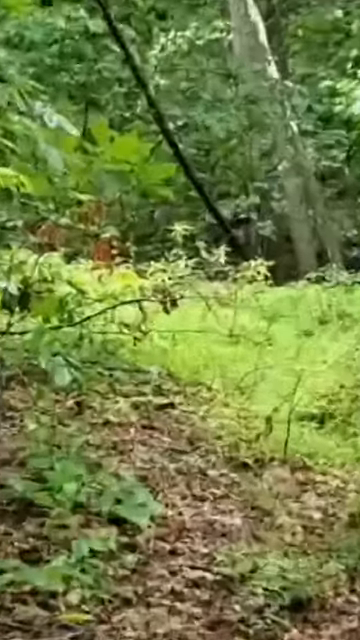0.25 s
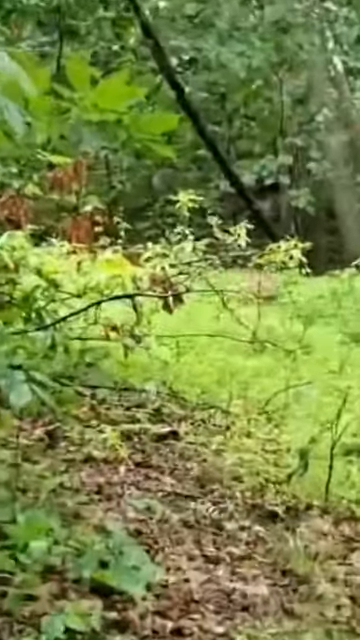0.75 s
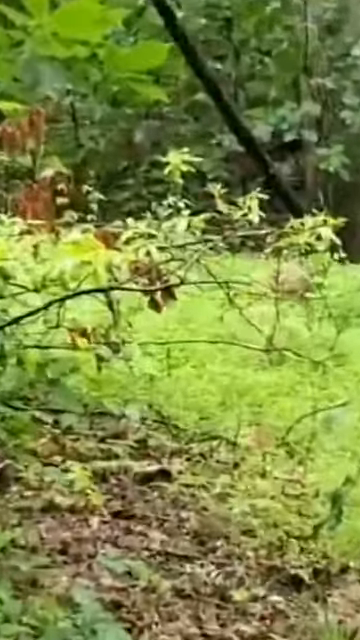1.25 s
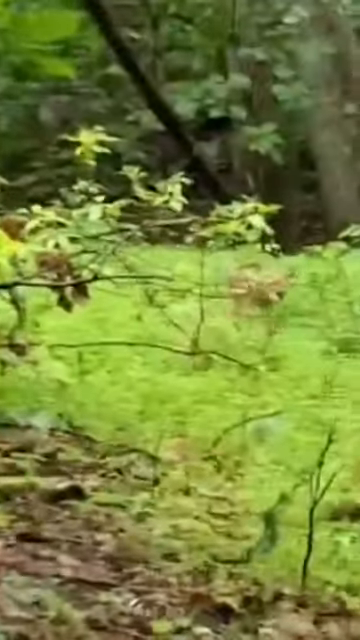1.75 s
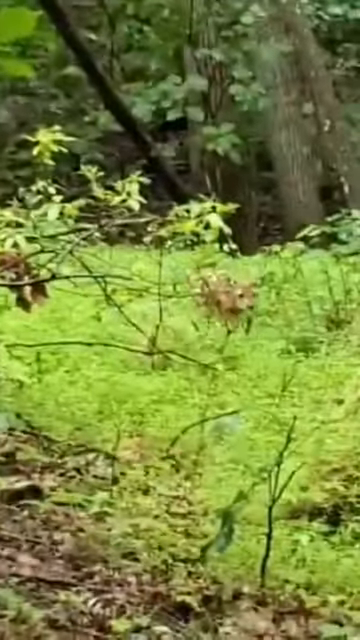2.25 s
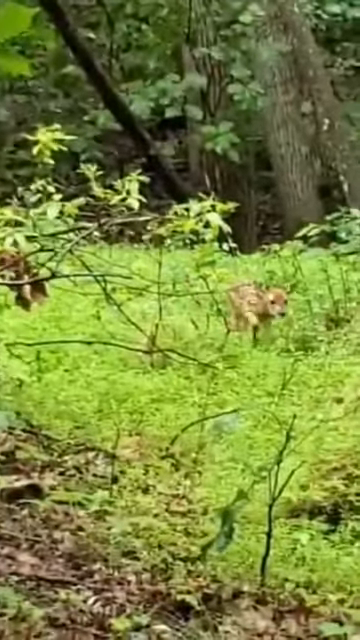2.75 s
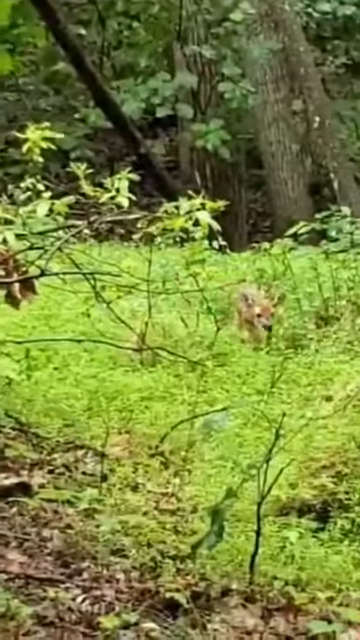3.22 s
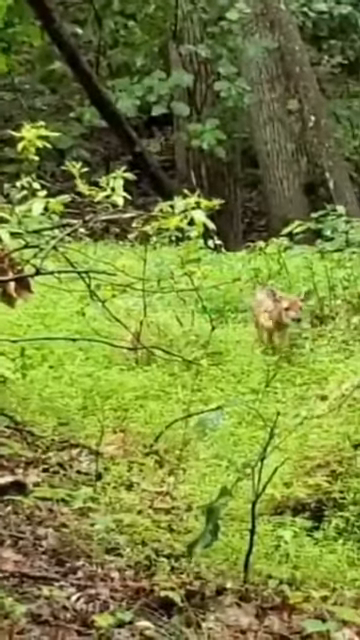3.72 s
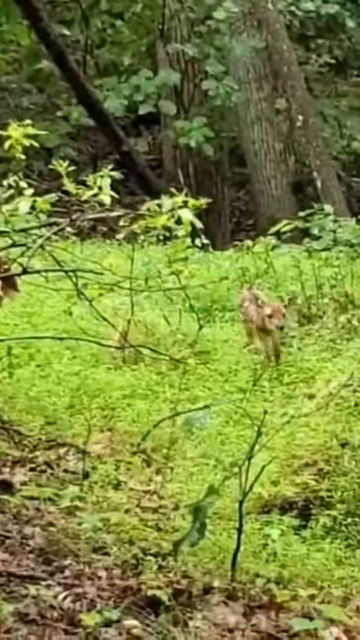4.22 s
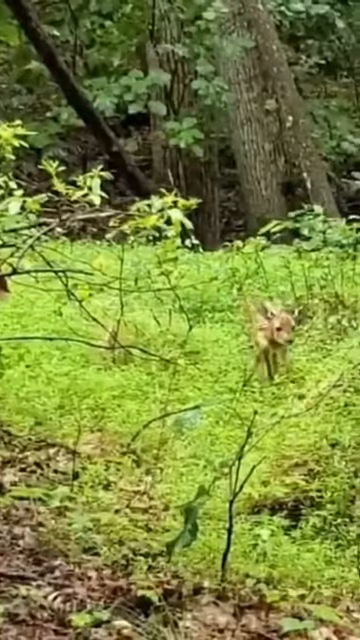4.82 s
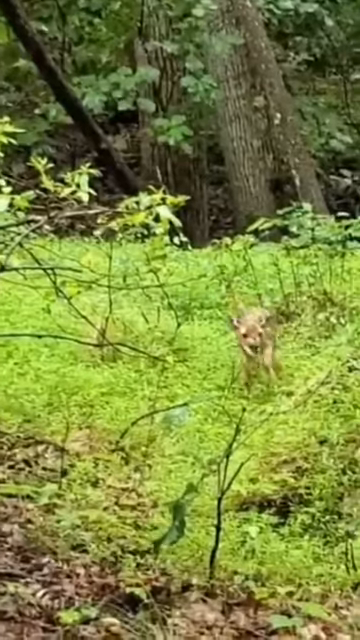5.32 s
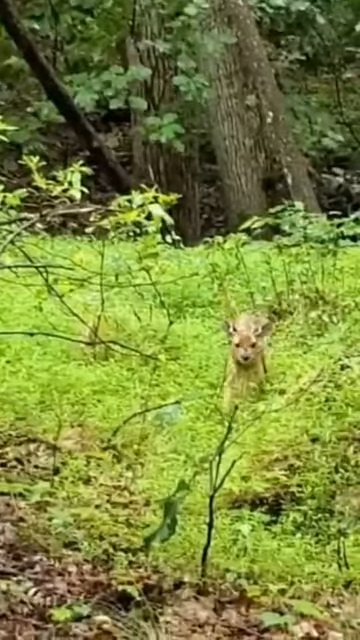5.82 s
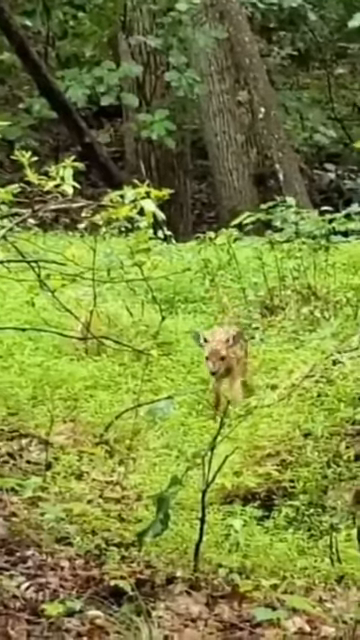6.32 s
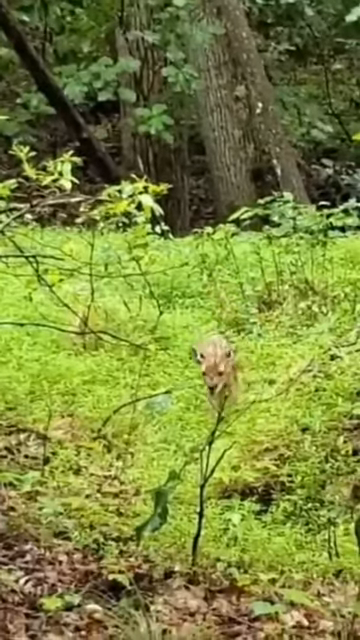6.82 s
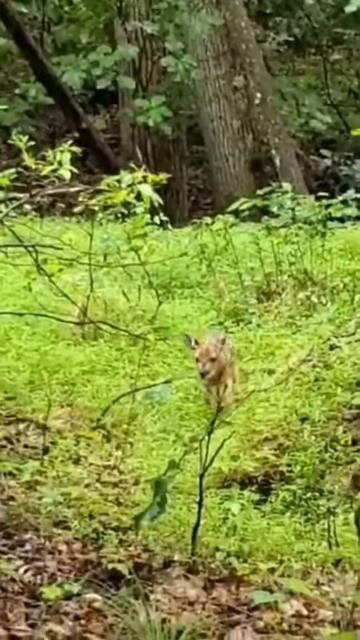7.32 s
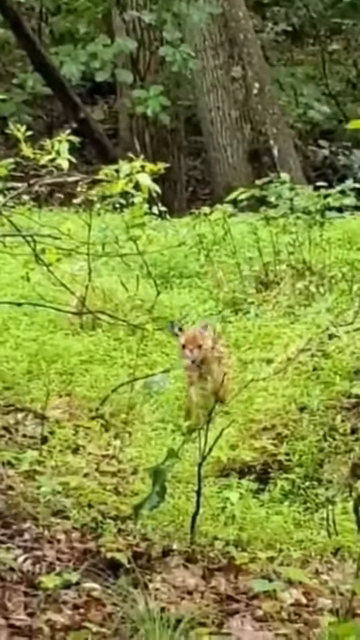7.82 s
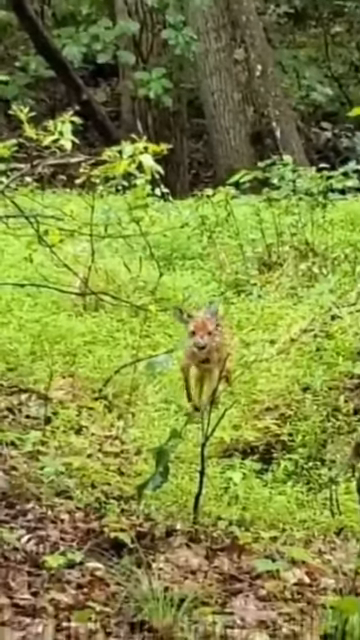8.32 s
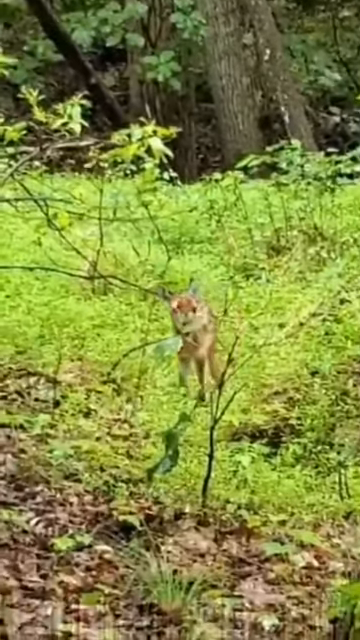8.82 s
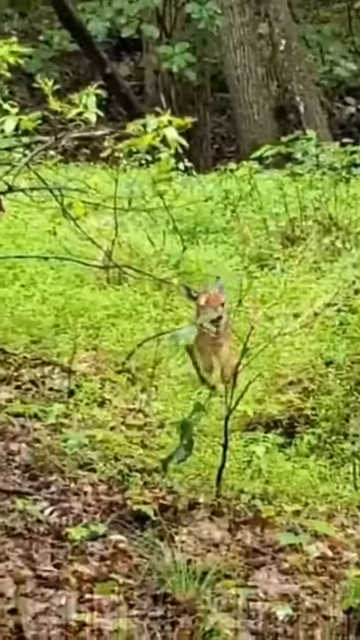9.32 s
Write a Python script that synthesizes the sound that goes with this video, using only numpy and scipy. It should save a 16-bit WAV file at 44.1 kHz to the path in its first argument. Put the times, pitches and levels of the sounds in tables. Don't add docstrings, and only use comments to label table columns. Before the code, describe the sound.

Outdoors among trees, a young deer calls repeatedly: short, whining, buzzy bleats that catch quickly, hold, then sag downward, the final two longer and stronger. Short woodland echoes follow each one. Between calls there is a faint steady leaf hiss, scattered dry twig snaps close by, dull wind thumps on the microphone's two sides, and a brief distant bird whistle late on.

```python
import sys
import numpy as np
from scipy import signal
from scipy.fft import rfft, irfft, next_fast_len
from scipy.io import wavfile
from scipy.ndimage import uniform_filter1d

SR = 44100
rng = np.random.default_rng(int(sys.argv[2]) if len(sys.argv) > 2 else 0)


def ratio(d):
    e = np.asarray(d, float) / 20
    return 10 ** e


def transcribe(u):
    v = np.clip(np.atleast_2d(u).T, -1, 1)
    q = np.round(v * 32767).astype(np.int16)
    wavfile.write(sys.argv[1], SR, q)


N = 421596

# time the folds catch in seconds, time until they have sagged in seconds,
# effort in dB, top pitch in Hz.
BLEATS = [
    (1.499, .415, -22, 574),
    (3.253, 0.44, -22, 567.1),
    (5.012, .39, -22.5, 567.2),
    (6.803, .505, -21, 561),
    (9.226, 0.53, -20, 571.2),
]
# creak before they catch in seconds, tensing time in seconds,
# suddenness of the sag (a power), end of the call as a share of the sag time.
FOLDS = [
    (.035, .025, 4.05, 1.02),
    (.035, .035, 5.18, 1.08),
    (.03, .027, 3.9, 1.3),
    (.042, .025, 3.29, 1.07),
    (.025, 0.04, 3.8, 1.05),
]
# low partials in dB, main resonance in dB,
# partials above it in dB, top partials in dB, left minus right in dB.
FACING = [
    (-0.9, 0, -2.5, -5, -1.5),
    (0.7, 2, -1.4, -2, -.5),
    (1, 2.1, -1.1, -1, 0),
    (-2.5, 1, -3, -3.5, 0),
    (0.5, 0.5, -2.5, -0.5, -0.5),
]
FACING_HZ = [1500, 2400, 3400, 5000, 7000, 12000]
# frequency in Hz, level in dB.
THROAT = [(560, -42.5), (950, -40), (1120, -23), (1450, -12), (2250, -17), (2800, -14), (3350, -3.5),
          (3900, -7), (4800, -6), (6500, -13), (7300, -32.5), (9500, -32), (11300, -33), (12500, -23)]
# frequency in Hz, left minus right in dB.
PORT_SHADOW = [(600, -0.5), (1600, 3), (2250, -16), (2900, -4), (3400, 7), (3950, 4.5), (4500, 4),
               (6500, 13.5), (8500, 10.5), (12500, 4)]
# frequency in Hz, lead in radians.
PORT_LEAD = [(300, 0.01), (1100, 0.41), (1700, .01), (2250, 0.45), (2800, 1.75), (3400, 1.8), (3950, 4.07),
             (4500, 4.12), (5600, 1.45), (6200, 10.66), (13500, 21.58)]
# frequency in Hz, time to fall 60 dB in seconds.
ECHO_TIME = [(500, 0.19), (1300, 0.58), (2600, 0.67), (3350, 0.86), (4200, 0.59), (6000, 0.68),
             (10000, 0.53)]
# frequency in Hz, level in dB per Hz.
LEAF_COLOUR = [(60, -0.5), (130, -17), (230, -13.5), (500, -10), (1100, -6.5), (1700, -6.5), (2500, -1),
               (3400, -4), (5000, -8), (6800, -11), (7500, -19), (11500, -23.5), (13000, -27.5)]
# frequency in Hz, likeness (1 is identical).
LEAF_LIKENESS = [(60, 1), (130, 0.97), (280, 0.64), (610, 0.73), (1310, -0.12), (2850, -0.03),
                 (6160, 0.0049), (13300, -0.059)]
# frequency in Hz, left minus right in dB.
LEAF_PAN = [(60, 5), (180, -6), (520, 4.5), (1530, -3), (4520, 1), (13300, 5)]
# time in seconds, hiss level in dB, extra treble of near leaves in dB.
RUSTLE = [(0, -56, 2), (.4, -57, 3), (0.602, -55, 4.5), (1, -54, 3), (1.4, -51.5, 4.5), (2.1, -51, 0.5),
          (2.6, -55.5, 2), (3.1, -54, 0), (4, -53.5, -2), (4.5, -56, 1.5), (5, -54.5, -1), (6, -56, -0.5),
          (6.702, -55, 1), (7.6, -55, -2.5), (8.2, -58.5, -0.5), (8.7, -57.5, -0.5), (9.56, -53, 2.5)]
# frequency in Hz, level in dB.
WIND_COLOUR = [(15, -45), (35, -6.5), (60, 3.5), (90, -6), (140, -21.5), (250, -29.5), (500, -52)]
# time in seconds, peak in dB, spread in seconds.
GUSTS_LEFT = [(.96, -79, 0.07), (1.33, -61, .03), (1.57, -41, 0.063), (1.95, -52, 0.048),
              (2.22, -51, 0.024), (2.45, -60, 0.19), (3.08, -58, .06), (3.47, -52, 0.083),
              (3.76, -44, 0.048), (4.04, -50, 0.063), (4.5, -53.5, .12), (4.79, -62, .04), (5.3, -55, 0.12),
              (6.16, -60, 0.036), (6.31, -47.5, 0.049), (6.72, -52, 0.028), (6.84, -46.5, 0.038),
              (7.2, -63, 0.21), (8.11, -49, 0.044), (8.3, -66, .1), (8.86, -54.5, 0.049),
              (9.08, -43, 0.046), (9.42, -62, .06)]
# time in seconds, peak in dB, spread in seconds.
GUSTS_RIGHT = [(.1, -61, 0.027), (.47, -60.5, 0.031), (.76, -72, 0.074), (1.1, -70, 0.068),
               (1.43, -58, .05), (1.55, -47, 0.033), (1.78, -38, .06), (2.2, -68, 0.18), (3.15, -66, 0.069),
               (3.48, -51, .04), (3.63, -43, 0.053), (3.78, -46, 0.062), (4.0, -45, 0.073),
               (4.19, -36, 0.068), (5.05, -58, 0.045), (5.39, -52, 0.084), (6.21, -50, .04),
               (6.56, -56, 0.085), (6.85, -59, .08), (7.16, -59, 0.12), (8.17, -66, .1), (8.55, -72, 0.15),
               (9.11, -58, .06)]
# time in seconds,
# peak in dB, ring in Hz, brightness in dB, left minus right in dB.
TICKS = [(0.599, -38, 2000, -19, 2), (0.7543, -33, 3060, -20, -1.0), (0.9572, -47, 2400, -25, 0.0),
         (1.0271, -42, 2360, -23, 3), (1.0915, -32, 4570, -26, 1), (1.2234, -38.5, 2950, -1, 4),
         (1.3055, -28.5, 3870, -20, -2), (1.3338, -29.5, 2460, -32, -1.5), (1.4176, -31, 4000, -6, -2),
         (2.7432, -44, 2630, -23, -4), (2.9706, -48, 3170, -20, 1), (3.2226, -29, 2690, -24, 0),
         (4.364, -36, 2440, -27, 11), (4.4053, -37, 3860, -9, -10), (4.4602, -35.5, 3100, -25, -8),
         (4.5578, -31.5, 4330, -11, 2), (4.6563, -37, 2680, -26, 2), (5.829, -35, 2100, -29, 1),
         (6.109, -37, 2750, -30, 3), (6.7086, -36.5, 2590, -27, 0), (6.772, -27.5, 4300, -9, 6),
         (7.539, -36, 3310, -17, -1.0), (8.896, -29, 2770, -9, 4), (9.0175, -35, 2600, -4, -1.0)]
# time in seconds, pitch in Hz, level in dB.
WHISTLE = [
    (7.57, 2100, -62),
    (7.62, 2240, -61),
    (7.67, 2320, -53),
    (7.72, 2344, -55),
    (7.75, 2380, -62),
    (7.82, 2370, -61),
    (7.93, 2340, -70),
]

EDGE_HZ = 13130
PREROLL = 26460
EARLIER_S, EARLIER_DB = -0.39, -9.5
TAUT_HZ, SLACK_HZ = 550, 420
SAG, LOWEST_HZ = 0.3, 300
SWELL_DB, SWELL_S, TIRE_DB_PER_S, SAG_DB = 17.5, 0.038, 14.5, 5
SETTLE_S, FADE_IN_S, FADE_OUT_S = 0.028, 0.021, 0.042
TREES_DB = -3.5
CALM_DB = -70


def evened(x):
    return x / np.sqrt(np.mean(x ** 2) + 1e-20)


def read(points, hz):
    f, value = np.transpose(points)
    return np.interp(np.log(hz + 1), np.log(f + 1), value)


def add(mix, s, sound):
    part = mix[..., round(s * SR):][..., :sound.shape[-1]]
    part += sound[..., :part.shape[-1]]


def colour(x, gain):
    size = next_fast_len(x.shape[-1] + 4096)
    spectrum = rfft(x, size) * gain(np.fft.rfftfreq(size, 1 / SR))
    return irfft(spectrum, size)[..., :x.shape[-1]]


def wobble(count, span):
    smooth = uniform_filter1d(rng.standard_normal(count), int(span))
    return evened(uniform_filter1d(smooth, int(span)))


def sides(pan_db):
    return np.array([[pan_db / 2], [-pan_db / 2]])


def bleat(row, folds, facing):
    _, length, peak_db, top_hz = row
    creak, tensing, suddenness, end = folds
    low_db, main_db, upper_db, top_db, pan_db = facing
    t = np.arange(-creak, end * length, 1 / SR)
    after = np.maximum(t, 0)

    sag = (after / length) ** suddenness
    untensed = np.minimum(np.exp(-t / tensing), 1)
    hz = np.maximum(top_hz * (1 - SAG * (untensed + sag)), LOWEST_HZ)
    effort_db = peak_db - SWELL_DB * np.minimum(np.exp(-t / SWELL_S), 1.1)
    effort_db = effort_db - TIRE_DB_PER_S * t - SAG_DB * np.minimum(sag, 1.5)
    slack = np.clip((TAUT_HZ - hz) / (TAUT_HZ - SLACK_HZ), 0, 1.5)

    turns = np.cumsum(hz * (1 + 0.0011 * wobble(len(t), 820))) / SR
    unsteady = 0.013 * np.minimum(slack, 1)
    unsteady += 0.032 * np.exp(-(after / (SETTLE_S + tensing)) ** 2)
    turns += 1.2 * unsteady * wobble(len(t), 110)

    k = np.arange(1, 33)[:, None]
    partial_hz = k * hz[::50]
    level_db = read(THROAT, partial_hz * (1 + 0.07 * slack[::50]))
    level_db += np.interp(partial_hz, FACING_HZ, [low_db, low_db, main_db, upper_db, upper_db, top_db])

    drift = uniform_filter1d(rng.standard_normal((3, *level_db.shape)), 24, axis=2)
    drift = evened(uniform_filter1d(drift, 10, axis=2))
    shimmer_db = (2.4 * drift[0] + 2.6 * drift[1:]) * np.minimum(0.2 * k, 1)
    heights = ratio(level_db + shimmer_db) * (partial_hz < EDGE_HZ)
    heights = np.repeat(heights, 50, axis=2)[..., :len(t)]

    pulses = (heights * np.cos(2 * np.pi * k * turns - 0.05 * k ** 2)).sum(1)
    pulses *= ratio(1.2 * slack * wobble(len(t), 60))

    puffs = (0.63 + np.exp(-(turns % 1) / 0.33)) * rng.standard_normal((2, len(t)))
    breath = evened(colour(puffs, lambda f: ratio(read(THROAT, f))))
    voice = evened(pulses) + 0.07 * slack ** 2 * breath
    voice += 0.042 * uniform_filter1d(puffs[0], size=40)
    voice /= np.sqrt(uniform_filter1d((voice ** 2).mean(0), 2500) + 1e-12)
    fade = np.clip(np.minimum((t - t[0]) / FADE_IN_S, (t[-1] - t) / FADE_OUT_S), 0, 1)
    return ratio(effort_db + sides(pan_db)) * voice * fade


def ports(x):
    def half(hz):
        return ratio(read(PORT_SHADOW, hz) / 2) * np.exp(0.5j * read(PORT_LEAD, hz))
    return colour(x, lambda hz: np.array([half(hz), 1 / half(hz)]))


def trees(x):
    taps = np.zeros((2, SR))
    at = np.arange(300, SR - 20, 20) + rng.integers(0, 20, (2, (SR - 301) // 20))
    np.put_along_axis(taps, at, rng.choice([-1.0, 1.0], at.shape), 1)
    taps[1] += 0.17 * taps[0]
    hz, t, z = signal.stft(taps, SR, nperseg=256)
    decay = ratio(-60 * t / read(ECHO_TIME, hz)[:, None])
    tail = signal.istft(z * decay, SR, nperseg=256)[1]
    return signal.fftconvolve(x[None], tail / np.linalg.norm(tail[0]), axes=1)[:, :len(x)]


def fawn():
    voice = np.zeros((2, N + PREROLL))
    earlier = ratio(EARLIER_DB) * bleat(BLEATS[1], FOLDS[1], FACING[1])
    add(voice, PREROLL / SR + EARLIER_S - FOLDS[1][0], earlier)
    for row, folds, facing in zip(BLEATS, FOLDS, FACING):
        add(voice, PREROLL / SR + row[0] - folds[0], bleat(row, folds, facing))
    direct = ratio(3.5) * ports(voice)
    echoed = ratio(TREES_DB) * trees(voice.mean(0))
    return (direct + echoed)[:, PREROLL:]


def twigs():
    out, t = np.zeros((2, N)), np.arange(600) / SR
    noises = rng.standard_normal((len(TICKS), 2, 600))
    for (s, peak_db, hz, bright_db, pan_db), noise in zip(TICKS, noises):
        snap = uniform_filter1d(noise, size=4) - uniform_filter1d(noise, size=30)
        snap *= ratio(-2.0 - 60 * t / 0.021)
        ring = 0.6 * np.sin(2 * np.pi * hz * t) * ratio(-60 * t / 0.006)
        crack = np.diff(noise[::-1], 2, prepend=0, append=0)
        crack *= ratio(bright_db - 12.0 - 60 * t / 0.01)
        add(out, s, ratio(peak_db + sides(pan_db)) * (snap + ring + crack))
    return out


def bird():
    s, hz, level_db = np.transpose(WHISTLE)
    t, out = np.arange(s[0], s[-1], 1 / SR), np.zeros((2, N))
    pitch = np.interp(t, s, hz) * (1 + 0.011 * wobble(len(t), 200))
    tone = np.sin(2 * np.pi * np.cumsum(pitch) / SR)
    tone *= ratio(np.interp(t, s, level_db) + 3.3 * wobble(len(t), 383))
    tone *= signal.windows.tukey(len(t), 0.1)
    add(out, s[0], tone * ratio([[-3.0], [7.0]]))
    return out


def leaves():
    frames, hz = N // 128 + 5, np.fft.rfftfreq(512, 1 / SR)
    a, b, c, d, patches = rng.standard_normal((frames, 257, 5)).T
    patches = evened(uniform_filter1d(uniform_filter1d(patches, 8, 0), 20, 1))
    same = np.clip(read(LEAF_LIKENESS, hz), -1, 1)[:, None]
    left = a + 1j * b
    right = same * left + np.sqrt(1 - same ** 2) * (c + 1j * d)
    z = np.array([left, right])
    z *= ratio(read(LEAF_COLOUR, hz)[:, None] + 1.4 * patches + 1.1 * wobble(frames, 4))
    z *= ratio(np.outer([0.5, -0.5], read(LEAF_PAN, hz)))[:, :, None]

    s, level_db, treble_db = np.transpose(RUSTLE)
    treble_db = np.interp(np.arange(frames) * 128 / SR, s, treble_db)
    z *= ratio(np.outer(np.clip(hz / 4000 - 1, 0, 1), treble_db))
    level_db = np.interp(np.arange(N) / SR, s, level_db)
    hiss = signal.istft(z, nperseg=512, noverlap=384)[1][:, :N]
    return ratio(level_db + 5.0) * evened(hiss)


def wind():
    t = np.arange(0, N + 200, 200) / SR
    push = []
    for gusts in (GUSTS_LEFT, GUSTS_RIGHT):
        swells = sum(ratio(db) * np.exp(-((t - s) / spread) ** 2) for s, db, spread in gusts)
        push.append(np.interp(np.arange(N) / SR, t, ratio(CALM_DB) + swells))
    low = evened(colour(rng.standard_normal((2, N)), lambda hz: ratio(read(WIND_COLOUR, hz))))
    lumps = ratio([2.0 * wobble(N, 900), 2.0 * wobble(N, 1200)])
    return low * lumps * push


def scene():
    return fawn() + leaves() + wind() + twigs() + bird()


def low_pass(x):
    return signal.sosfilt(signal.butter(12, 13920, fs=SR, output="sos"), x)


def record(dry):
    lowpass = signal.firwin(511, EDGE_HZ, window=("kaiser", 9), fs=SR)
    limited = signal.oaconvolve(dry, lowpass[None], "same")
    return low_pass(limited)


dry = scene()
out = record(dry)
transcribe(out)
```